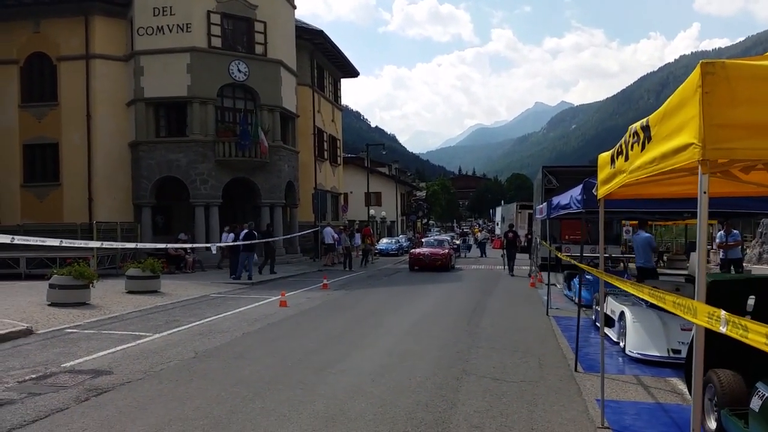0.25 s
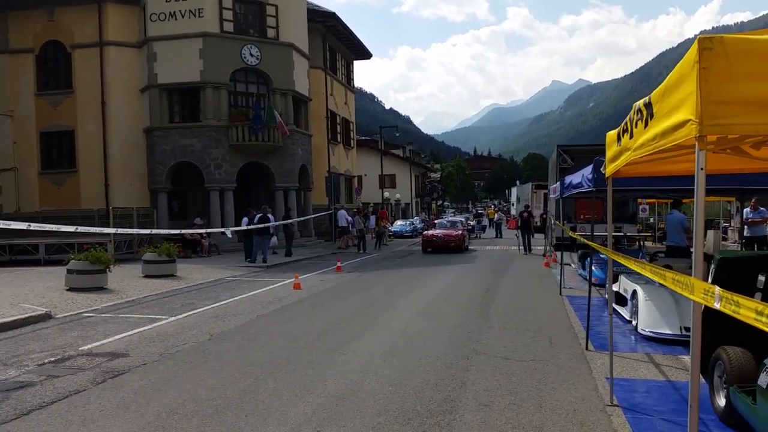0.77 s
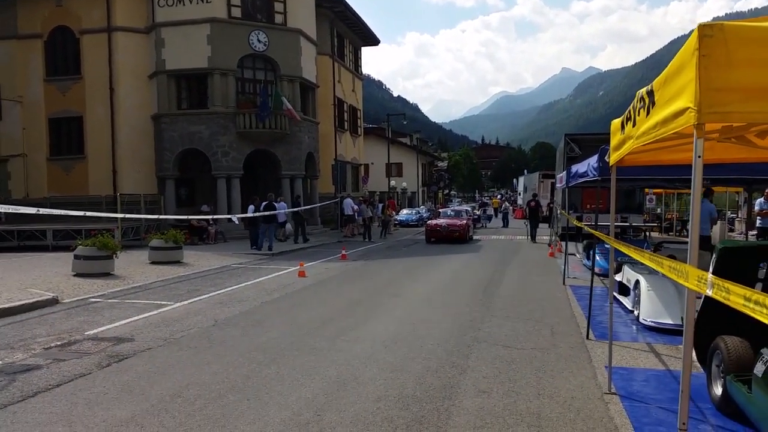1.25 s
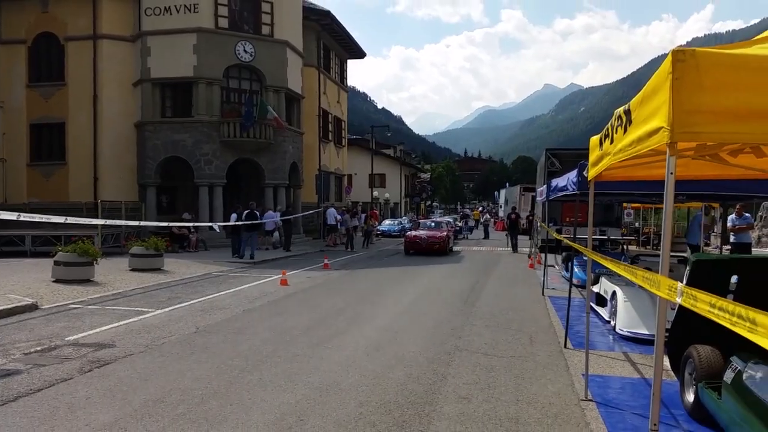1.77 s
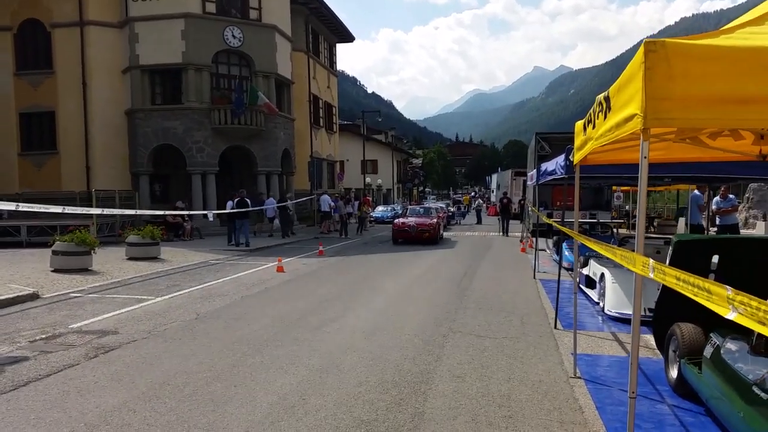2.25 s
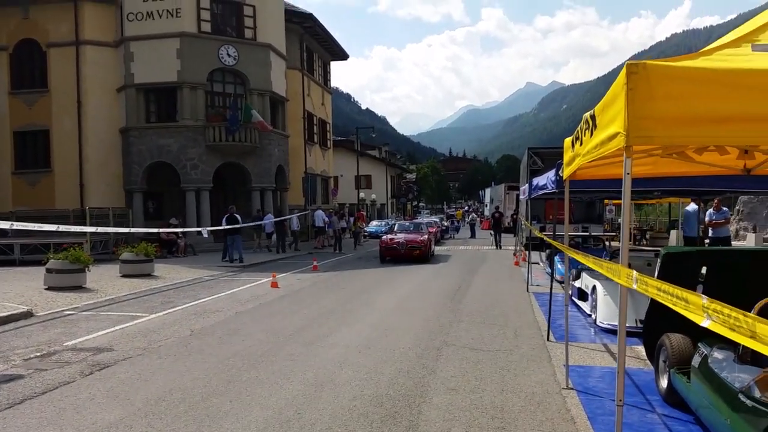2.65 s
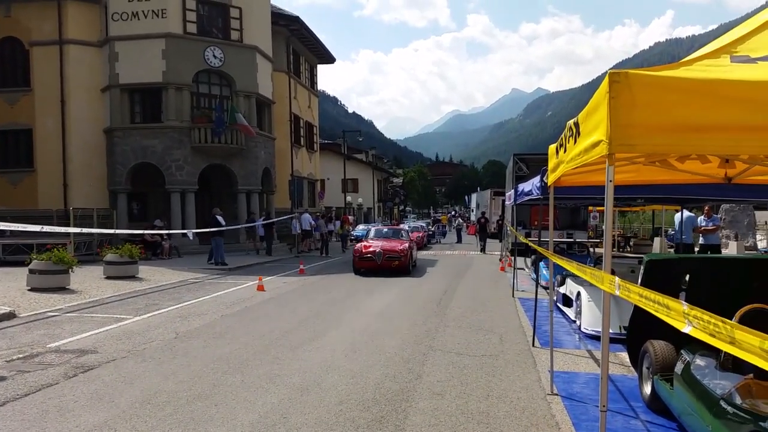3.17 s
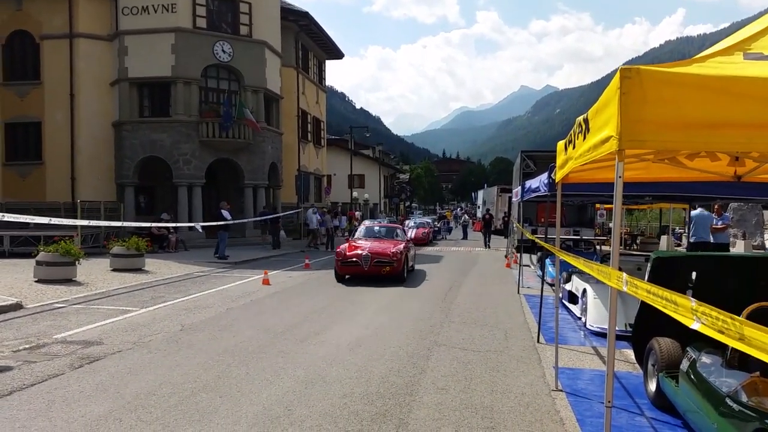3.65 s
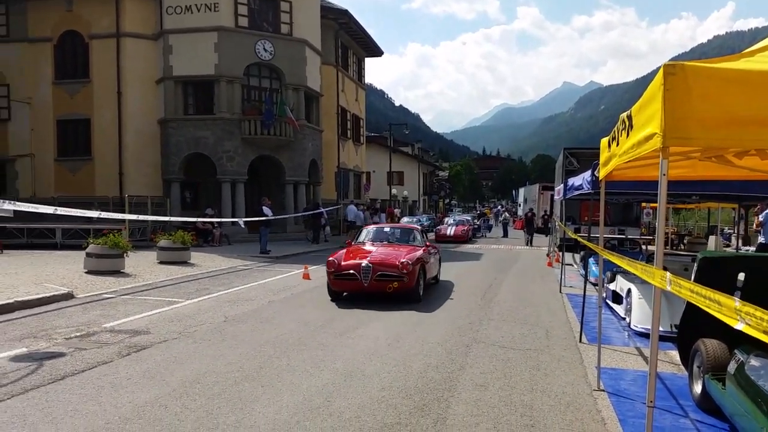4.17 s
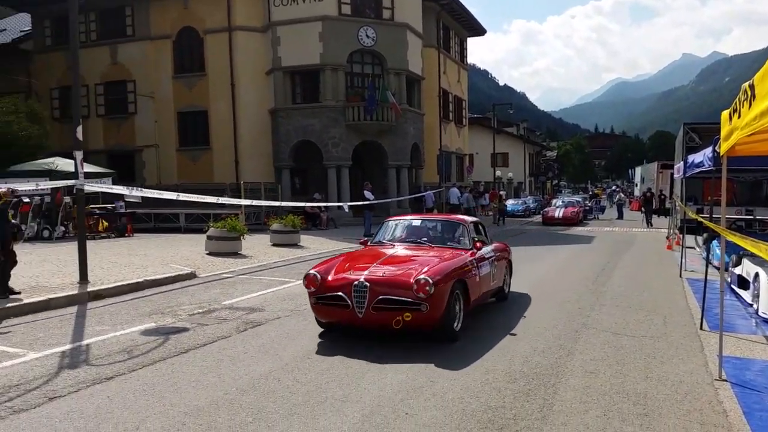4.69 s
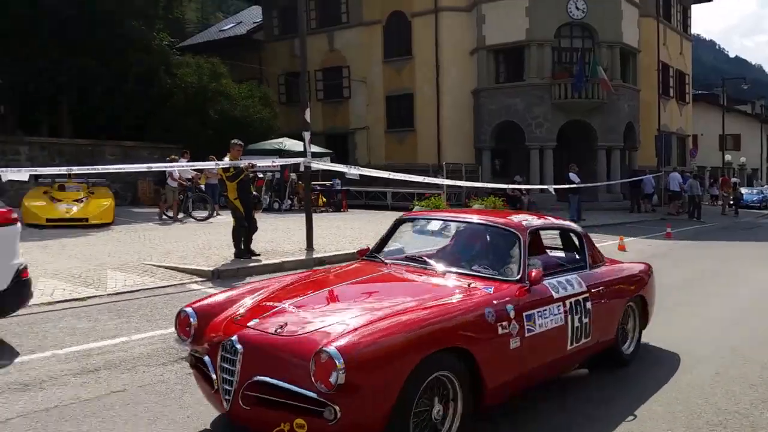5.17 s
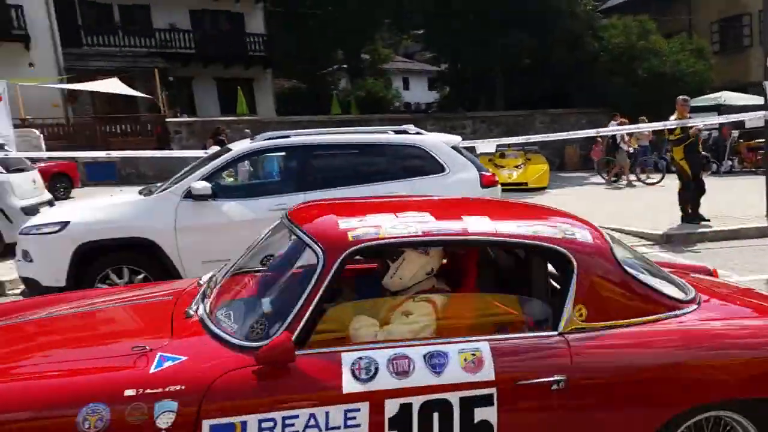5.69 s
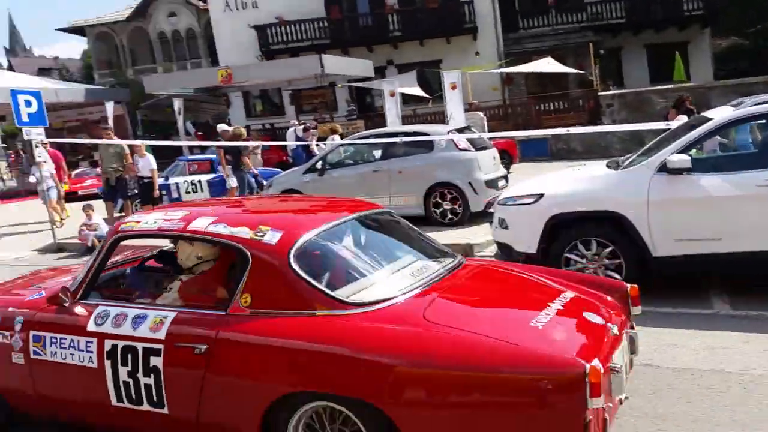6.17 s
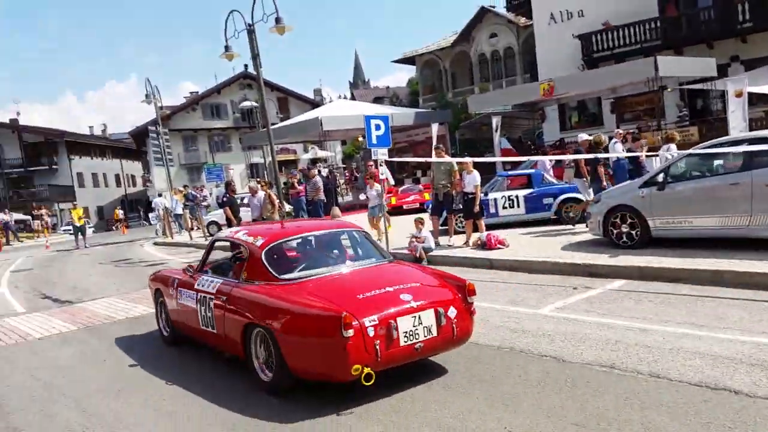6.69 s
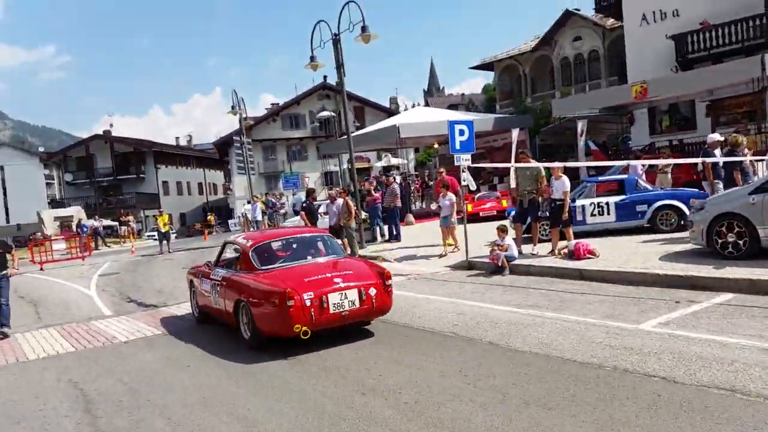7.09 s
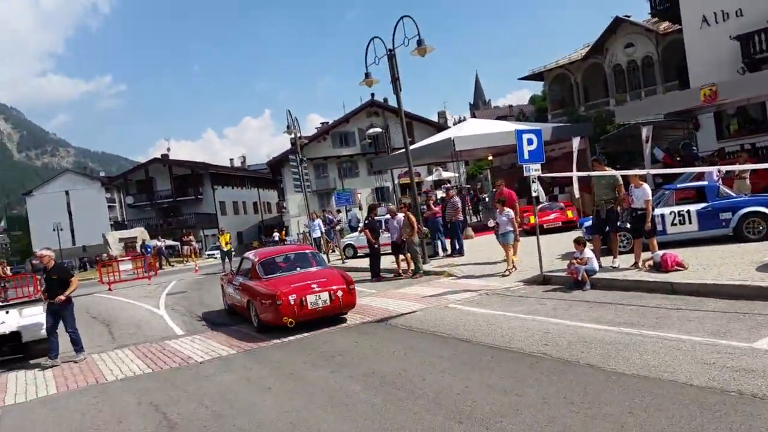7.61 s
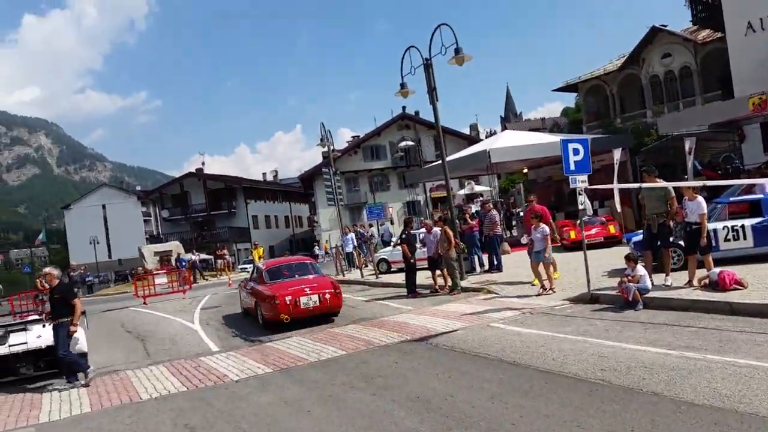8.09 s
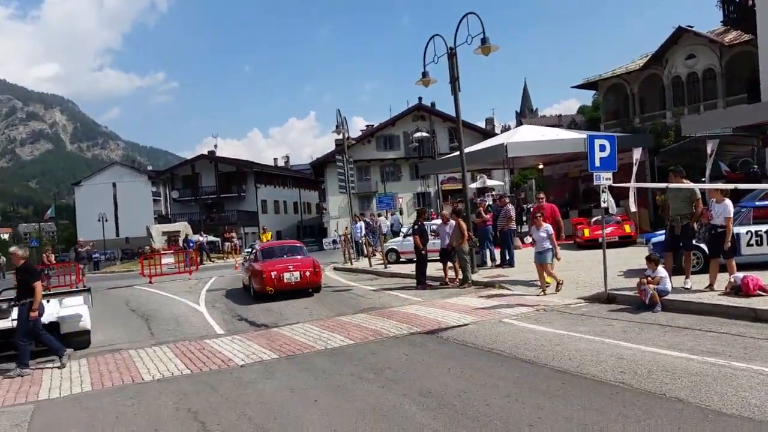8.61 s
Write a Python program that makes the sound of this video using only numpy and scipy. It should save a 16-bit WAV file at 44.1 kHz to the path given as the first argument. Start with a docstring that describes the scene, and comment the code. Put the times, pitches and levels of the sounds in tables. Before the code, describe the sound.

An old racing car approaches with a booming, raspy exhaust, drives past, revs once and drops to low revs with brief brake squeaks.

```python
"""A village street, stereo microphones 3 m from the line of a classic four-cylinder racing car. It pulls
away, passes close by, blips the throttle and rolls on. Its firings ring the exhaust, lumpy at low revs
and even when it pulls; carburettors and valve gear rush once a firing. Throttle and position shape the
levels, and the house fronts echo it. The pipe coughs, gears whine, brakes squeal, and at the end the
engine-bay rush swells as if the next car were drawing near. Waiting engines rumble far off."""
import sys
import numpy as np
from scipy import signal
from scipy.fft import rfft, irfft, next_fast_len
from scipy.io import wavfile
from scipy.ndimage import uniform_filter1d

SR = 44100
rng = np.random.default_rng(int(sys.argv[2]) if len(sys.argv) > 2 else 0)


def materialize(psi):
    """Save the field psi as 16-bit PCM at rate SR to the path in sys.argv[1].

    A 1-D psi becomes a single channel; in a 2-D psi each row is a channel.
    """
    bounded = np.clip(np.atleast_2d(psi).T, -1, 1)
    quanta = np.round(bounded * 32767).astype(np.int16)
    wavfile.write(sys.argv[1], SR, quanta)


N = 390285
T = np.arange(N) / SR

# Engine speed. Each row: time in seconds, firings per second.
FIRING_RATE = [(0, 41.6), (.5, 49.62), (.9, 59.8), (1.0, 69.96), (1.2, 79.05), (1.4, 79.04), (1.7, 88.4),
               (2.0, 81.33), (2.4, 67.84), (2.68, 60.62), (3.3, 77.48), (3.9, 90.75), (4.3, 97.83),
               (4.8, 101.1), (5.3, 101.3), (6.42, 87.7), (6.8, 112.1), (7.0, 96.96), (7.65, 55.3),
               (7.95, 47.81), (8.5, 58), (8.85, 59.6)]
# The driver's foot. Each row: time in seconds, throttle from 0 to 1.
THROTTLE_OPENING = [(.35, 0.5), (.6, .64), (.8, 0.62), (1.2, 0.85), (2.05, 0.75), (2.5, 0.91), (3.3, 0.84),
                    (4.25, 0.89), (5.3, 0.7), (5.95, .36), (6.35, .24), (6.55, 0.72), (6.75, .94),
                    (6.88, .34), (7.5, 0), (8.0, 0.24), (8.5, 0.49), (8.85, 0.51)]
# Lumpy running. Each row: start and end in seconds, firing scatter in dB, lope from 0 to 1, gas in dB.
LUMPY_SPELLS = [(-.5, 1.0, 3, .48, -22), (4.25, 5.58, .45, .15, -34), (5.58, 6.3, 1.0, .08, -20),
                (7.45, 8.1, 2.7, .28, -21), (8.1, 9.5, .9, .5, -27)]
# Spectra of the pipe with its silencer, and of the gas in it. Each row: frequency in Hz, level in dB.
PIPE_SPECTRUM = [(25, -27.5), (52, -4.5), (85, 7.5), (110, 7), (150, 1), (200, -0.5), (245, -11),
                 (295, -15.5), (350, -18.5), (430, -21.5), (760, -30), (920, -40.5), (1400, -38),
                 (4000, -76.5)]
GAS_SPECTRUM = [(30, 1.5), (80, -6.5), (130, -1), (200, 3), (340, 9), (490, 7.5), (650, 11), (900, 15),
                (2000, 8.5)]
# Resonances of pipe and engine bay. Each row: frequency in Hz, width in Hz, lift in dB.
PIPE_RESONANCES = [(75.5, 56, 2.5), (165, 27, 5), (303, 55, 1), (471.5, 24, 7), (654, 240, 10),
                   (1099, 370, 16)]
BAY_RESONANCES = [(1640, 92, 1.5), (2370, 100, 5)]
# The exhaust's boom, and its body an octave higher. Each row: time in seconds, level in dB.
BOOM_LEVEL = [(0.04, -9), (0.16, -21.5), (0.75, -18), (1.22, -19), (1.27, -13.5), (3.45, -18), (3.84, -10),
              (3.92, -23), (3.99, -9), (4.13, -14.5), (4.26, -9), (5.36, -15.5), (5.68, -8.5), (6.57, -12),
              (6.98, -19), (7.15, -11.5), (7.72, -30.5), (7.92, -19.5), (8.58, -15.5), (8.85, -15.5)]
BODY_LEVEL = [(0.04, -26), (1.19, -13.5), (1.34, -25.5), (1.56, -12.5), (3.06, -17), (3.45, -10),
              (4.23, -15), (4.28, -24), (4.6, -15.5), (4.92, -18), (5.19, -12.5), (6.39, -23.5),
              (6.49, -12.5), (6.69, -13), (6.93, -25), (7.28, -22.5), (7.48, -39), (8.23, -17),
              (8.73, -14.5), (8.85, -25.5)]
# Spectra of carburettors, bay hiss, far engines and ticks. Each row: frequency in Hz, level in dB.
RASP_SPECTRUM = [(200, -21), (500, -6.5), (800, 0.5), (1100, 7), (1400, -3.5), (1700, -2), (2050, -1.5),
                 (2400, -6), (2900, -9.5), (3600, -18.5), (6000, -42)]
HISS_SPECTRUM = [(1800, -21.5), (3000, 1.5), (4000, 1.5), (5000, 0), (6000, 0.5), (7000, -5), (8000, -17.5),
                 (9300, -20), (10500, -13.5), (11900, -6.5), (13500, -12), (15500, -15)]
RUMBLE_SPECTRUM = [(24, -42), (40, 2), (80, -18.5), (197, -26.5), (279, -18), (485, -25.5), (625, -15),
                   (1040, -39), (1890, -33.5), (10000, -85), (13000, -109), (22000, -120)]
TICK_SPECTRUM = [(3000, -28), (6000, -1.5), (8500, -10), (10500, -3.5), (13000, -1), (15500, 1)]
# Exhaust coughs. Each row: start in seconds, level in dB, centre in Hz, decay in seconds.
COUGH_BURSTS = [(.189, -20, 190, .04), (.889, -22, 720, .03), (.889, -36, 1700, .03)]
# Sharp ticks. Each row: start in seconds, level in dB before colouring.
SHARP_TICKS = [(1.222, -37), (2.39, -43), (4.14, -56), (5.97, -46), (6.05, -44), (8.708, -39)]
# Fine crackle. Each row: middle and length in seconds, level in dB before colouring.
CRACKLE_SPELLS = [(5.8, 0.52, -67), (6.62, 0.76, -64.5), (8.536, .9, -56)]
# Whine of the engine's gears. Each row: time in seconds, level in dB.
WHINE_LEVEL = [(0, -65), (3.4, -49), (4.2, -35), (4.6, -38), (5.05, -37), (5.3, -30.5), (5.55, -43),
               (6.5, -60), (8.85, -75)]
# Its tones. Each row: multiple of the firing rate, relative level in dB.
WHINE_TONES = [(6, -4), (6.5, 0), (10.5, -7), (11, -11)]
# Brake squeals. Each row: start and length in seconds, pitch in Hz, level in dB.
BRAKE_SQUEALS = [(7.402, .05, 13650, -43), (7.455, .04, 13700, -44), (7.975, .04, 13720, -45),
                 (8.068, .06, 13660, -38), (8.429, .035, 13570, -21), (8.455, .045, 13740, -36),
                 (8.475, .17, 2540, -41.5)]
# Echoes off the house fronts. Each row: first and last lag in seconds, gain in dB with the car far off.
WALL_ECHOES = [(0.014, .027, -10.5), (.029, 0.01227, -12), (0.046, .071, -6)]
# Stereo width of the street's echo. Each row: frequency in Hz, side against mid in dB.
ECHO_WIDTH = [(60, -36), (150, -23), (300, -12.5), (600, -8.5), (1100, -1.5), (3000, -0.5), (14000, 2.5)]
# Balance of the microphones. Each row: frequency in Hz, left minus right in dB.
MIC_BALANCE = [(60, 2), (125, 2.5), (250, 3.5), (500, 6.5), (1000, 4), (5000, 5), (8000, 5), (13000, -4.5)]

PASS_S, SPEED_M_S, CLOSEST_M = 6.21, 5.55, 2.93  # the car's path past the microphones
ECHO_DB, ECHO_DB_PER_DOUBLING = -14, 6  # echo at the closest point, and its rise with distance
MID_REVS_HZ = 80  # firing rate from which octaves of revs are counted
# Upper voices of the pipe. Each, in dB: level at full throttle, drop with the throttle shut,
# change from behind, change per octave of revs.
BARK, HONK, SNARL = (-24.5, 26.5, -2, -4), (-31.5, 28.5, 4.5, 0.5), (-39, 18.5, -6, -2.5)
# Voices of the bay. Each, in dB: level at full throttle, drop with the throttle shut, change from behind,
# change per doubling of distance, change per octave of revs, level of the closing swell.
RASP = (-33.5, 12.5, -18.5, -0.69, 1, -39.5)
HISS = (-45, -2, -20.5, -2.5, 3.5, -53)
SIZZLE = (-50, 15, -22.5, -2.5, 7.5, -64.5)


def undb(db):
    """Decibels to gain."""
    return 10 ** (np.asarray(db) / 20)


def curve(table):
    """A table's (time, value) points joined by straight lines."""
    return np.interp(T, *np.transpose(table))


def db_at(spectrum, hz):
    """Level of a spectrum at any frequency."""
    f, db = np.transpose(spectrum)
    return np.interp(np.log(hz + 1), np.log(f), db)


def colour(x, spectrum, resonances=(), size=8192):
    """Causal filter with a broad spectrum and resonances on top."""
    hz = np.arange(size // 2 + 1) * SR / size
    peaks_db = sum(lift / (1 + (2 * (hz - f) / width) ** 2) for f, width, lift in resonances)
    cepstrum = irfft(np.log(undb(db_at(spectrum, hz) + peaks_db)))
    cepstrum[1:size // 2] *= 2  # fold to minimum phase
    cepstrum[size // 2 + 1:] = 0
    return signal.oaconvolve(x, irfft(np.exp(rfft(cepstrum))))[:len(x)]


def weigh(x, gain):
    """Weight a sound by a gain that is a function of frequency."""
    size = next_fast_len(x.shape[-1] + 8192)
    hz = np.arange(size // 2 + 1) * SR / size
    return irfft(rfft(x, size) * gain(hz), size)[..., :x.shape[-1]]


def band(x, low_hz, high_hz):
    """Steep band-pass; neighbouring bands add up flat."""
    return weigh(x, lambda f: 1 / (1 + (f / high_hz) ** 12) - 1 / (1 + (f / low_hz) ** 12))


def ride(x, db):
    """Hold a stereo sound to a slow level curve, keeping its quick throb."""
    window = SR // 9
    power = uniform_filter1d(uniform_filter1d(x.mean(axis=0) ** 2, window), window)
    return x * undb(db) / np.sqrt(np.abs(power) + 1e-18)


def street(x, wet_db, t60, damp_hz=9000):
    """Direct sound plus a tail from the house fronts, wide in the treble and central in the bass."""
    t = T[:SR]
    envelope = np.exp(-np.log(1000) * t / t60) * (1 - np.exp(-t / 0.012))
    tails = rng.standard_normal((2, SR)) * envelope
    tails = weigh(tails / np.sqrt(np.sum(tails[0] ** 2)), lambda f: 1 / np.hypot(1, f / damp_hz))
    side_tail = weigh(tails[1], lambda f: undb(db_at(ECHO_WIDTH, f)))
    mid = signal.oaconvolve(x * undb(wet_db), tails[0])[:N]
    side = signal.oaconvolve(x * undb(wet_db), side_tail)[:N]
    return x + mid + np.array([side, -side])


def house_fronts(x, wet_db):
    """Single echoes whose lags slide as the car moves, so that harmonics swell and fade in turn."""
    out = x
    for first, last, db in WALL_ECHOES:
        lag = np.linspace(first, last, N)
        out = out + undb(db + np.minimum(wet_db, 0)) * np.interp(T - lag, T, x, left=0)
    return out


def car_position():
    """Doublings of the closest distance, and how far the tail has turned to the microphones (0-1)."""
    along = SPEED_M_S * (T - PASS_S)
    distance = np.hypot(along, CLOSEST_M)
    return np.log2(distance / CLOSEST_M), (1 + along / distance) / 2


def roughness(octaves, fade_s=.25):
    """The engine burns more evenly as the revs rise, and fades in and out of its lumpy spells."""
    scatter_db = .7 * undb(-11.5 * octaves)
    lope = np.full(N, .045)
    gas_db = -32 - 10 * octaves
    out = even = np.array([scatter_db, lope, gas_db])
    for start, end, *lumpy in LUMPY_SPELLS:
        share = np.clip((T - start) / fade_s + .5, 0, 1) - np.clip((T - end) / fade_s + .5, 0, 1)
        out = out + share * (np.array(lumpy)[:, None] - even)
    return out


def firings(hz, scatter_db, lope, max_lag_s=.00055, jitter_s_per_db=.00003):
    """One pulse per firing; the more the engine lopes, the later and weaker every second one comes."""
    count = np.cumsum(hz) / SR
    at = np.searchsorted(count, np.arange(int(count[-1]) + 1))
    cylinder = np.arange(len(at)) % 4
    cylinder_db = np.array([0.81, -1.3, -0.38, 0.51])[cylinder]
    late = cylinder % 2
    chance = rng.standard_normal((len(at), 2))
    strength = undb(scatter_db[at] * np.clip(chance[:, 0], -2, 2) + cylinder_db)
    strength *= 1 - lope[at] * late
    delay = late * max_lag_s * np.tanh(lope[at] / .17)
    delay += jitter_s_per_db * scatter_db[at] * chance[:, 1]
    return np.bincount(np.clip(at + (delay * SR).astype(int), 0, N - 1), strength, N)


def puffs(pulses, decay_s, steady):
    """Gas noise that flares at each firing over a steady flow."""
    flares = signal.lfilter([1], [1, -np.exp(-1 / (decay_s * SR))], pulses)
    return rng.standard_normal(N) * (steady + flares)


def pipe_level(voice, shut, octaves, behind):
    """A voice of the pipe opens with the throttle, and changes with the revs and as the tail turns."""
    full_db, shut_db, behind_db, revs_db = voice
    return full_db - shut_db * shut + behind_db * behind + revs_db * octaves


def exhaust(pulses, gas_db, pipe_db, wet_db):
    """Firings and turbulent gas boom in the silencer; under load the upper resonances bark and honk."""
    bark_db, honk_db, snarl_db = pipe_db
    gas = colour(puffs(pulses, decay_s=.003, steady=.12), GAS_SPECTRUM)
    pipe = colour(pulses + undb(gas_db) * gas, PIPE_SPECTRUM, PIPE_RESONANCES)
    pipe = house_fronts(pipe, wet_db)
    low = street(pipe, wet_db - 6, t60=.7)
    high = street(pipe, wet_db, t60=0.87)
    boom = ride(band(low, 18, 130), curve(BOOM_LEVEL))
    body = ride(band(low, 130, 280), curve(BODY_LEVEL))
    bark = ride(band(high, 280, 540), bark_db)
    honk = ride(band(high, 540, 880), honk_db)
    snarl = ride(band(high, 880, 4000), snarl_db)
    return boom + body + bark + honk + snarl


def bay_level(voice, shut, octaves, behind, doublings, swell_db_per_s=20.5):
    """The bay sounds forwards: it grows on approach, is hidden once past, then swells for the next car."""
    full_db, shut_db, behind_db, far_db, revs_db, end_db = voice
    own_db = full_db - shut_db * shut * (1 - behind) + revs_db * octaves
    own_db += behind_db * behind + far_db * doublings
    swell_db = end_db + swell_db_per_s * (T - T[-1])
    return 20 * np.log10(np.hypot(undb(own_db), undb(swell_db)))


def engine_bay(pulses, bay_db, wet_db):
    """The carburettors gulp at each firing; valve gear, fan and tyres hiss above them."""
    rasp_db, hiss_db, sizzle_db = bay_db
    rasp = colour(puffs(pulses, decay_s=0.0048, steady=0.66), RASP_SPECTRUM, BAY_RESONANCES)
    rasp = street(rasp, 0.44 * wet_db + 2.5, t60=1.0)
    rush = colour(puffs(pulses, decay_s=0.0054, steady=0.098), HISS_SPECTRUM)
    rush = street(rush, 0.24 * wet_db + 5, t60=0.28, damp_hz=14000)
    hiss, sizzle = band(rush, 1000, 9300), band(rush, 9300, 20000)
    return ride(rasp, rasp_db) + ride(hiss, hiss_db) + ride(sizzle, sizzle_db)


def waiting_engines():
    """Engines waiting further down the street merge into a low rumble, more echo than direct sound."""
    rumble = colour(rng.standard_normal(N), RUMBLE_SPECTRUM)
    return ride(street(rumble, wet_db=8.3, t60=0.27), db=-42)


def coughs():
    """Rich mixture bursts in the pipe as the car pulls away."""
    out = np.zeros(N)
    for start, db, hz, decay in COUGH_BURSTS:
        gas = rng.standard_normal(N)
        burst = gas * (T > start) * np.exp(-np.abs(T - start) / decay)
        edges = hz * .8, hz * 1.2
        out += undb(db) * band(burst, *edges) / band(gas, *edges).std()
    return street(out, wet_db=-12.5, t60=0.92)


def ticking(pulses, spread_db=5):
    """A few sharp ticks, and spells of fine crackle in time with the firings."""
    swell = sum(undb(db) * np.cos(np.pi * np.clip((T - middle) / length, -.5, .5))
                for middle, length, db in CRACKLE_SPELLS)
    uneven = pulses * undb(spread_db * np.clip(rng.standard_normal(N), -2, 2))
    crackle = puffs(uneven, decay_s=.001, steady=0)
    out = swell * crackle / crackle.std()
    for start, db in SHARP_TICKS:
        out += undb(db) * rng.standard_normal(N) * (T > start) * np.exp(-np.abs(T - start) / .003)
    return street(colour(out, TICK_SPECTRUM), wet_db=-2.5, t60=.2, damp_hz=15000)


def gear_whine(hz, wet_db, waver_db=1.5):
    """Gear teeth sing at fixed multiples of the engine speed, loudest as the grille nears."""
    level_db = curve(WHINE_LEVEL)
    phase = 2 * np.pi * np.cumsum(hz) / SR
    out = np.zeros(N)
    for multiple, db in WHINE_TONES:
        waver = band(rng.standard_normal(N), 0.91, 76)
        gain = undb(level_db + db + waver_db * waver / waver.std())
        out += gain * np.sqrt(2) * np.sin(multiple * phase)
    return street(out, wet_db - 3.5, t60=0.13)


def brakes(waver=.012):
    """The shoes grab in short bursts and set a mode of the drum singing, unsteady in pitch."""
    out = np.zeros(N)
    drift = band(rng.standard_normal(N), 20, 260)
    bend = 1 + waver * drift / drift.std()
    for start, length, hz, db in BRAKE_SQUEALS:
        grip = np.sin(np.pi * np.clip((T - start) / length, 0, 1))
        out += undb(db) * np.sqrt(2) * grip * np.sin(2 * np.pi * np.cumsum(hz * bend) / SR)
    return street(out, wet_db=-3, t60=.36, damp_hz=18000)


def scene():
    """The street as heard from the kerb: revs, throttle and position shape the car's sound."""
    hz = curve(FIRING_RATE)
    octaves = np.log2(hz / MID_REVS_HZ)
    shut = 1 - np.clip(curve(THROTTLE_OPENING), 0, 1)
    doublings, behind = car_position()
    wet_db = ECHO_DB + ECHO_DB_PER_DOUBLING * doublings
    scatter_db, lope, gas_db = roughness(octaves)
    pulses = firings(hz, scatter_db, lope)
    pipe_db = [pipe_level(voice, shut, octaves, behind) for voice in (BARK, HONK, SNARL)]
    bay_db = [bay_level(voice, shut, octaves, behind, doublings) for voice in (RASP, HISS, SIZZLE)]
    engine = exhaust(pulses, gas_db, pipe_db, wet_db) + engine_bay(pulses, bay_db, wet_db)
    return engine + gear_whine(hz, wet_db) + coughs() + ticking(pulses) + brakes() + waiting_engines()


def record(dry, ceiling=.98, top_hz=15850):
    """The left microphone is hotter except in the high treble; peaks are rounded and the top is cut."""
    left = weigh(dry[0], lambda f: undb(db_at(MIC_BALANCE, f) / 2))
    right = weigh(dry[1], lambda f: undb(-db_at(MIC_BALANCE, f) / 2))
    mics = np.array([left, right])
    rounded = mics / (1 + np.abs(mics / ceiling) ** 8) ** (1 / 8)
    return signal.sosfilt(signal.ellip(10, .1, 80, top_hz, fs=SR, output="sos"), rounded)


dry = scene()
out = record(dry)
materialize(out)
```